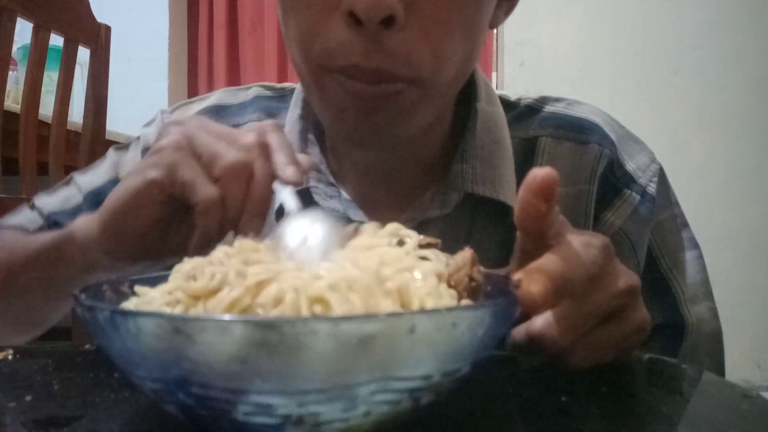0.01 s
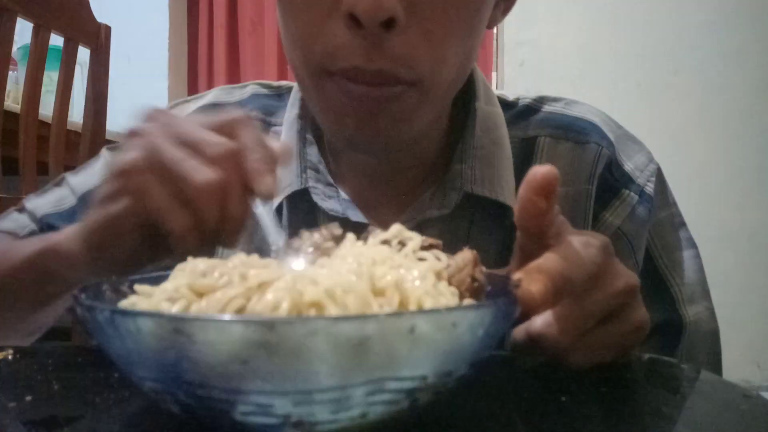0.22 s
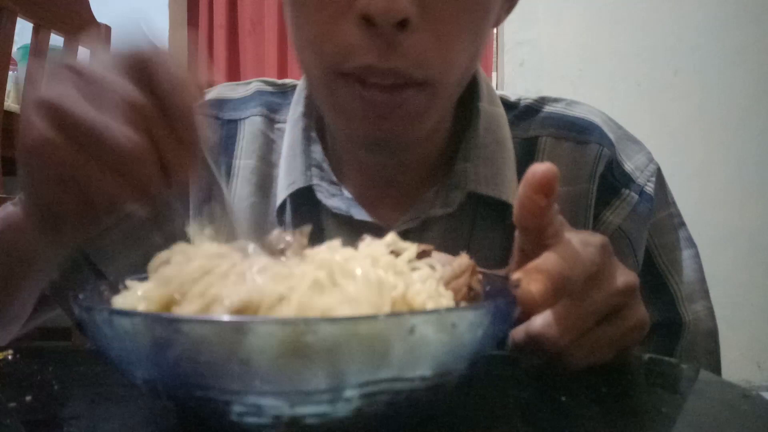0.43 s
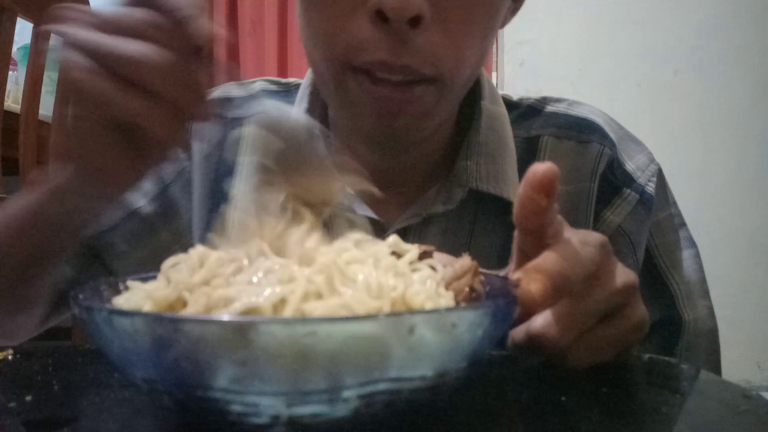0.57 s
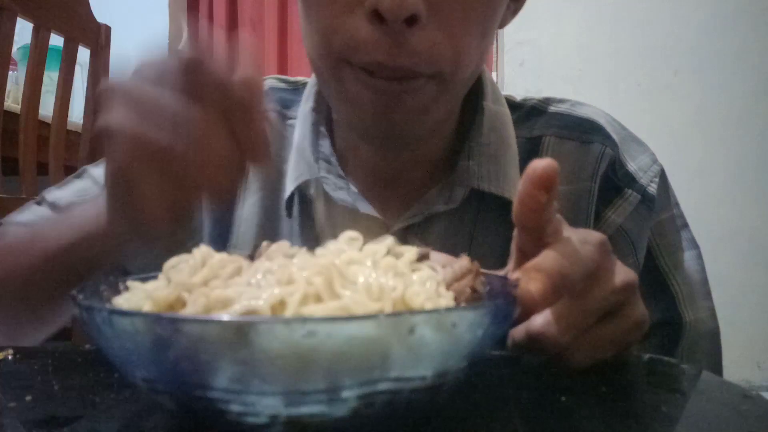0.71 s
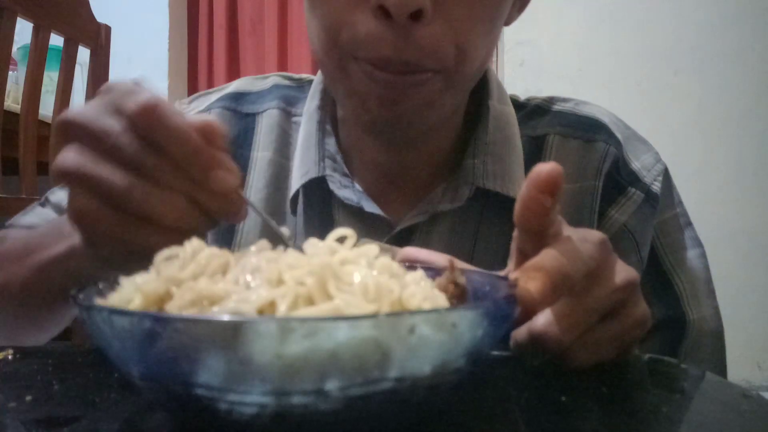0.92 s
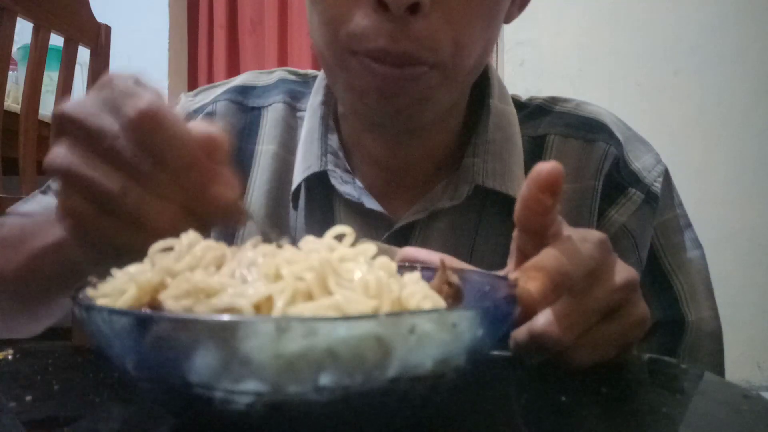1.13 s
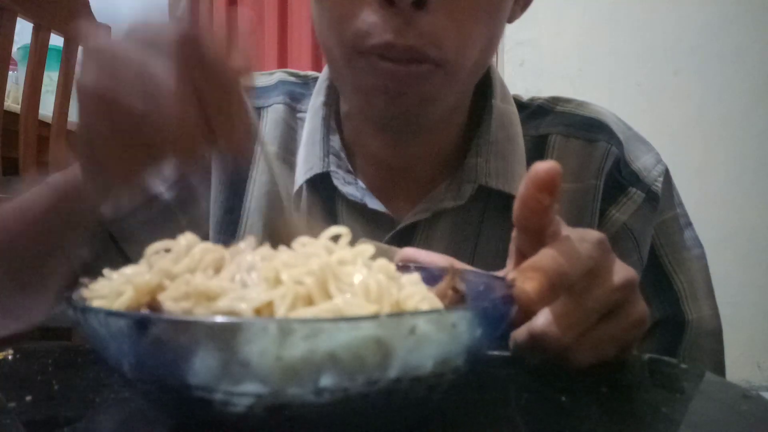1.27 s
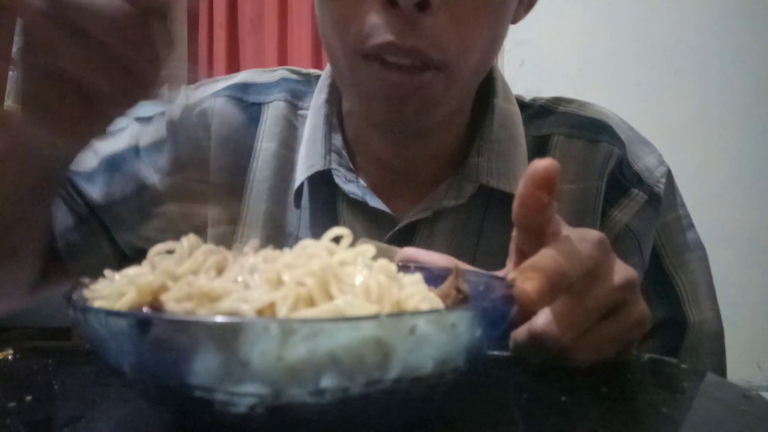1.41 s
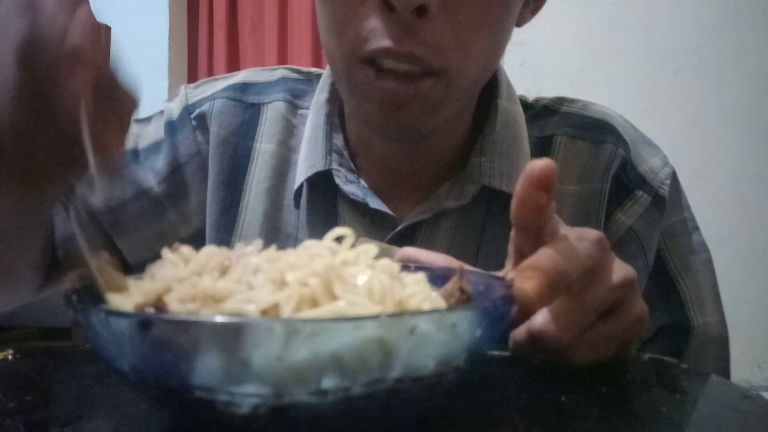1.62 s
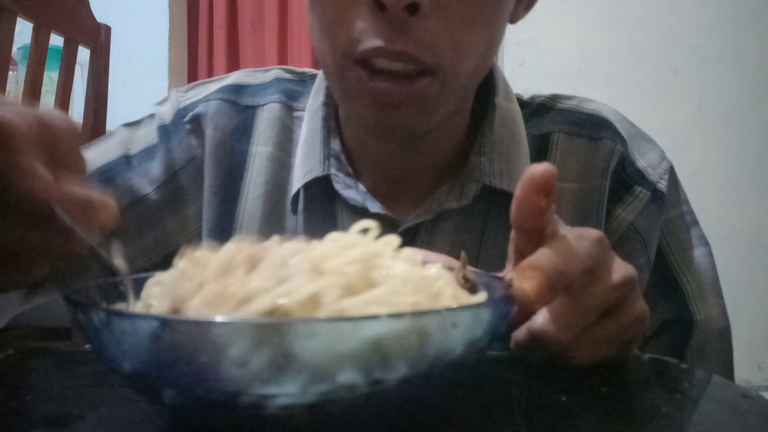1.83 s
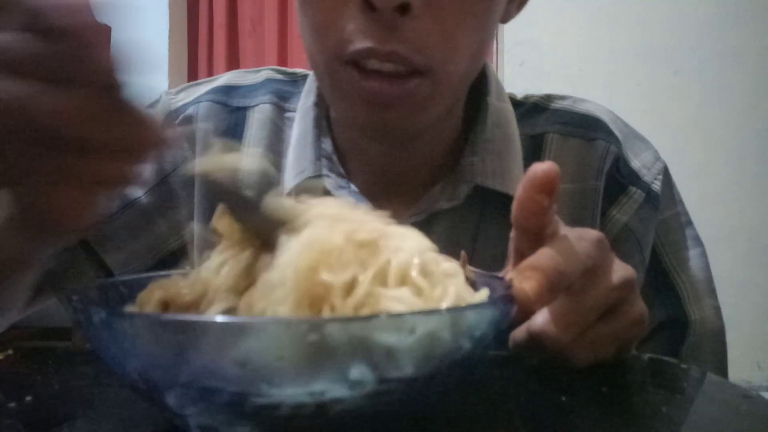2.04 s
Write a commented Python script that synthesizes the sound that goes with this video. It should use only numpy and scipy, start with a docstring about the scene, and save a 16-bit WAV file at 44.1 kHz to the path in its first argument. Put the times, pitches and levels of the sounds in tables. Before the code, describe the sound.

Close up in a hard-walled room, a spoon clacks on a glass bowl, rubs softly, bumps the bowl against the table, quiets down, then strikes hard twice with low thuds, over thin hissing insect chorus.

```python
"""Spoon stirring noodles in a glass bowl

A metal spoon stirs noodles in a glass bowl on a table, close to a small microphone in a hard room.
Short pushes set ringing tones going: the spoon clinks on the glass and the bowl knocks the table top.
Random grains make the scrape, noise bursts the cracks, and soft-started tones the noodle clicks and,
ahead of them, a soft, longer ring of the bowl. Shaped noise makes the two insect choruses and
the faint high hiss from outside, and the air of the room.
"""
import sys
import numpy as np
from scipy import signal
from scipy.fft import rfft, irfft
from scipy.io import wavfile
from scipy.ndimage import uniform_filter1d

SR = 44100
rng = np.random.default_rng(int(sys.argv[2]) if len(sys.argv) > 2 else 0)


def generate_wav(sig):
    """Save sig (samples, or channels by samples) to the path in sys.argv[1] as 16-bit PCM at SR."""
    pcm = np.round(np.clip(np.atleast_2d(sig).T, -1, 1) * 32767).astype(np.int16)
    wavfile.write(sys.argv[1], SR, pcm)


def voltage_ratio(decibels):
    """Convert decibels (scalar or array-like) to amplitude ratios, 20 dB per decade."""
    exponent = np.asarray(decibels, float) / 20
    return 10 ** exponent


N = 90405  # length in samples, about 2 seconds

# Tone colour of the room air. Each row: frequency in Hz, level in dB.
AIR_COLOUR = [(15, -12), (30, -16.5), (60, -3.5), (120, 1.5), (230, -1.5), (330, 1.5), (500, -6),
              (800, -14), (1500, -14.5), (2700, -17.5), (3500, -14), (4000, -35), (6000, -47), (7500, -27)]
# Tone colour of the thin high hiss. Each row: frequency in Hz, level in dB.
HISS_COLOUR = [(7000, -3), (8200, -11), (10000, -14), (11500, -11), (13800, -11), (14500, -4), (15600, 4),
               (15850, -12)]
AIR_LEVEL_DB, HISS_LEVEL_DB = -70, -83

# Swells of the insects. Each row: time in seconds, lower chorus level in dB, upper chorus level in dB.
CHORUS_SWELLS = [(0, -63.5, -61), (.055, -75, -60), (.075, -56, -60.5), (.2, -60.5, -59),
                 (.4, -57.5, -58.5), (.49, -68, -49), (.51, -57.5, -60), (.6, -55.5, -61.5),
                 (.75, -67.5, -62.5), (.87, -60.5, -60), (.97, -63.5, -57.5), (1.09, -63, -63),
                 (1.14, -75, -58.5), (1.25, -59.5, -59.5), (1.36, -69.5, -58.5), (1.46, -59.5, -60.5),
                 (1.6, -76, -58.5), (1.85, -63, -54), (2.05, -61.5, -57)]
# Tone colour of the lower chorus. Each row: frequency in Hz, level in dB.
LOWER_CHORUS_COLOUR = [(2290, -72), (3900, -33), (3970, -75), (4040, -5.5), (4860, 12.5), (5200, -0.5),
                       (5350, -5), (5600, -17.5), (7280, -33), (12300, -120)]
# Tone colour of the upper chorus. Each row: frequency in Hz, level in dB.
UPPER_CHORUS_COLOUR = [(3470, -56), (5900, -26), (5970, -16), (6090, -14.5), (6470, 1.5), (7380, -5),
                       (7680, -22.5), (7840, -21), (8100, -54.5), (10500, -65), (17800, -120)]

# Echo tail of the room, band by band. Each row: middle frequency in Hz, level in dB,
# time to fall by 60 dB in seconds.
ROOM_BANDS = [(139, -9, 0.38), (300, 1.5, 0.5), (600, -1, 0.31), (1110, -6.5, 0.36), (2400, -6.5, 0.38),
              (4800, -4, 0.43), (8300, -5.5, 0.32), (14000, -8, 0.1)]
ROOM_ONSET_S = 0.0032

# Spoon dragging on glass. Each row: time in seconds, low rub level in dB, bright rub level in dB,
# hiss level in dB.
SCRAPE_LEVELS = [(0, -63.5, -67, -85.5), (.1, -58, -71, -87), (.16, -64.5, -72, -86), (.3, -53.5, -55, -90),
                 (.4, -54.5, -58, -77), (.46, -73.5, -65.5, -82.5), (.65, -74, -91.5, -92),
                 (.83, -69.5, -75.5, -87), (1.0, -77, -70, -87), (1.12, -82, -76, -90),
                 (1.23, -62, -62, -90), (1.3, -78, -78, -88), (1.44, -86, -71, -87),
                 (1.455, -69.5, -68, -88), (1.55, -61, -73, -90), (1.65, -63, -57.5, -87),
                 (1.75, -55, -54.5, -84), (1.9, -61, -62.5, -75), (2.05, -65, -62.5, -79)]
# Resonances of the low rub. Each row: frequency in Hz, nominal width in Hz, level in dB.
LOW_RUB_PEAKS = [(306, 33, -16), (617, 125, 1.5), (842, 82, -3.5), (930, 57, 1), (1065, 60, 0),
                 (1249, 91, -9.5)]
# Resonances of the bright rub. Each row: frequency in Hz, nominal width in Hz, level in dB.
BRIGHT_RUB_PEAKS = [(1566, 160, -7), (1773, 120, 0), (2590, 2700, -1), (3360, 160, 4), (5320, 1530, 13.5)]
# Tone colour of the rubbing hiss. Each row: frequency in Hz, level in dB.
RUB_HISS_COLOUR = [(7500, -10), (8200, 1.5), (9500, 1), (11000, -7.5), (13000, -18)]
RUB_GRAINS_PER_S, RUB_SPREAD_DB = 4000, 1.5

# Clicks of noodles, and first a soft, longer ring of the bowl. Each row: start in seconds, level in dB,
# frequency in Hz, time to fall by 60 dB in seconds (the code uses at least 0.003).
CLICKS_AND_BOWL_RING = [(0.205, -40, 6700, 0.3), (.3625, -32, 13500, 0.0046), (.364, -36, 15100, 0.0055),
                        (0.419, -28.5, 5660, 0.0027), (.70, -52, 8450, 0.012), (0.771, -45, 3400, 0.0077),
                        (1.354, -48, 5200, 0.015), (1.364, -45.5, 3325, 0.015), (1.371, -51, 3170, .015),
                        (1.363, -49, 5000, 0.019), (1.3825, -43, 3180, 0.021), (1.385, -45.5, 4420, 0.019),
                        (1.384, -52.5, 1804, 0.031), (1.4, -54.5, 2740, 0.033), (1.965, -56, 9600, 0.0052)]
CLICK_RISE_MS = 0.79

# Noisy cracks and brushes of contact. Each row: start in seconds, direct level in dB,
# level sent into the room in dB, rise in ms, fall in ms, bottom frequency in Hz, top frequency in Hz.
CONTACT_CRACKS = [(.221, -22, -14.5, 0.36, 2.04, 910, 6930), (0.2227, -38, -43, 0.18, 2, 8300, 15800),
                  (.363, -58, -62, 0.76, 3.1, 11000, 15500), (0.383, -58, -62, 1.5, 3, 3000, 14000),
                  (0.47, -51.5, -43.5, 2.9, 19, 248, 710), (.6985, -32, -31.5, 0.52, 5.1, 335, 2680),
                  (1.178, -48, -53, 5.5, 26, 300, 5200), (1.448, -62, -58, .6, 11, 300, 1347),
                  (1.687, -33.5, -23, 0.22, 2.2, 600, 7100), (1.687, -44.5, -43.5, 0.16, 2.8, 8000, 16300),
                  (1.7572, -45, -51, 0.76, 2.2, 1000, 15600), (1.7635, -44.5, -36, 0.74, 2.3, 1000, 15500)]

# The bowl knocks the table top. Each row: start in seconds, thud push in dB, rap push in dB,
# lasting boom push in dB, contact time in ms.
TABLE_KNOCKS = [(.062, -86, -52, -94, 0.66), (.095, -56, -57, -54.5, 0.48), (0.2224, -36, -29, -83, 0.2),
                (.236, -34.5, -59, -35, 1.4), (0.473, -36.5, -43, -47, 1.1), (.53, -50, -68, -46.5, 1.1),
                (0.573, -51.5, -55, -51.5, 0.65), (0.689, -48, -54, -73, 0.29),
                (0.698, -33.5, -30, -42.5, 0.26), (0.749, -67, -58, -51, 1.53),
                (.8215, -74, -46.5, -67, 0.45), (1.184, -56, -60, -56.5, 0.47), (1.201, -50, -51, -56, 0.8),
                (1.449, -78, -67, -89, 0.12), (1.512, -74, -48, -74, 0.48), (1.527, -77, -59, -73, 0.52),
                (1.556, -69, -46.5, -63.5, 0.42), (1.6868, -26.5, -28, -34, 0.24),
                (1.696, -31.5, -50, -78, 0.59), (1.702, -35, -49, -37, 1.23),
                (1.756, -36.5, -36.5, -73, 0.51), (1.781, -27, -50, -32, 2.18),
                (1.872, -71, -55, -51, 0.52)]
# Short low tones of the knock. Each row: frequency in Hz, level in dB before the step-down in knocks(),
# time to fall by 60 dB in seconds.
THUD_MODES = [(185.5, 0, 0.19), (234.4, -6, 0.094), (312, -5, 0.11), (392, -8.5, 0.048), (443, -0.5, 0.12)]
# Short high tones of the knock. Each row: frequency in Hz, level in dB before the step-down in knocks(),
# time to fall by 60 dB in seconds.
RAP_MODES = [(540.3, -4, 0.034), (601, -4, 0.044), (749, -10, 0.042), (872, 0.5, 0.021), (969, -4, 0.034),
             (1223, -0.5, 0.022), (1590, -14.5, 0.022), (1995, -6, 0.058), (2090, -1, 0.028),
             (2670, -12, .025), (2890, 8.5, 0.033)]
# Long tones of the table top. Each row: frequency in Hz, level in dB, time to fall by 60 dB in seconds.
TABLE_MODES = [(69.5, -12.5, 0.24), (128.5, -21.5, 1.8), (151.7, -6, 0.83), (201.5, -8, 0.66),
               (269.7, -8, 0.81), (322, -13, 1.3), (420, -15, 0.42), (470, -21, 0.42)]
KNOCK_LOW_HZ = 161

# Spoon blows on the glass. Each row: start in seconds, spoon push in dB, handle push in dB,
# lower bowl push in dB, upper bowl push in dB, contact time in ms.
SPOON_BLOWS = [(0.221, -8, -64, -58, -45, 0.09), (.382, -53, -70, -54, -62, 0.082),
               (.574, -59, -70, -51.5, -55, 0.24), (1.188, -38.5, -66, -51, -62, .1),
               (1.6867, -30, -31.5, -24, -26, 0.055), (1.7023, -41, -62, -38, -34.5, 0.1),
               (1.75, -60, -44, -54, -63, 0.033), (1.7569, -50, -33, -40, -34.5, 0.047),
               (1.7659, -36, -50, -33, -35, 0.065)]
# Tones of the spoon. Each row: frequency in Hz, level in dB, time to fall by 60 dB in seconds.
SPOON_MODES = [(2226, -17.5, 0.022), (2575, -24.5, .02), (3220, -22, 0.015), (4210, -5.5, 0.019),
               (4965, -3, 0.021), (5720, -13, 0.023), (5950, -14, 0.016), (6665, 6.5, 0.023),
               (7200, -8, 0.027), (7700, -36, 0.035), (9900, -36, .05), (11600, -36, .025)]
# Tone of the handle. Each row: frequency in Hz, level in dB, time to fall by 60 dB in seconds.
HANDLE_MODES = [(4145, 0, .07)]
# Lower tones of the glass bowl. Each row: frequency in Hz, level in dB, time to fall by 60 dB in seconds.
LOWER_BOWL_MODES = [(1034, -12.5, 0.089), (1691, -2, 0.011), (1783, -4.5, 0.032), (2040, -12, 0.021),
                    (2580, -15, 0.033), (3310, -6, 0.025), (3476, -2, 0.036), (3730, -1.5, 0.024)]
# Upper tones of the glass bowl. Each row: frequency in Hz, level in dB, time to fall by 60 dB in seconds.
UPPER_BOWL_MODES = [(4930, -7, 0.018), (6050, -7, 0.07), (6060, -4.5, 0.096), (6280, 6.5, 0.037),
                    (6900, -10.5, 0.06), (6460, -9, 0.017), (7800, -21, 0.014), (8500, -30, 0.038),
                    (12400, -22, .04)]

KNOCK_ROOM_DB, RING_ROOM_DB = 0.5, -7  # how strongly knocks and ringing enter the room
MIC_LOW_HZ = 51.4


def level(x, db=0):
    """Set the average (rms) strength of a sound."""
    return x * voltage_ratio(db) / np.sqrt(np.mean(x ** 2))


def curve(table, col):
    """Turn one dB column of a table into a gain that moves smoothly over time."""
    table = np.array(table)
    return voltage_ratio(np.interp(np.arange(N) / SR, table[:, 0], table[:, col]))


def coloured(points, x=None):
    """Filter noise (or x) by a curve of (Hz, dB) points, silent outside them; rms 1."""
    points = np.array(points)
    hz = np.arange(1, N // 2 + 2) * SR / N
    if x is None:
        x = rng.standard_normal(N)
    db = np.interp(np.log(hz), np.log(points[:, 0]), points[:, 1], -200, -200)
    return level(irfft(rfft(x) * voltage_ratio(db), N))


def walk(rate):
    """Wander randomly: values held for 1 / rate seconds, then smoothed twice; spread near 1."""
    hold = int(SR / rate)
    steps = np.repeat(rng.standard_normal(N // hold + 1), hold)
    smooth = uniform_filter1d(uniform_filter1d(steps, hold), hold)
    return 1.3 * smooth[:N]


def pushes(times, dbs, contact_ms):
    """Make bell-shaped contact forces; a longer contact is duller."""
    force = np.zeros(N + 400)
    k = np.arange(400)
    for start_s, db, ms in zip(times, dbs, contact_ms):
        first = int(start_s * SR)
        contact = ms * SR / 1000  # in samples
        # the push peaks two contact times after its start
        from_peak = k - start_s * SR + first - 2 * contact
        push = np.exp(-.5 * (from_peak / (.4 * contact)) ** 2)
        force[first:first + 400] += voltage_ratio(db) * push / push.sum()
    return force[:N]


def ring(force, modes, sense=-1):
    """Let a force drive fading tones; each next tone is multiplied by one more factor of sense."""
    out = np.zeros(N)
    for k, (hz, db, t60) in enumerate(modes):
        fade = np.log(1000) / max(t60, .003)  # never shorter than 3 ms
        pole = np.exp((2j * np.pi * hz - fade) / SR)
        tone = signal.lfilter([1], [1, -pole], force).imag
        out += sense ** k * voltage_ratio(db) * tone
    return out


def room_air():
    """The quiet air of the room is steady noise, strongest in the bass."""
    return voltage_ratio(AIR_LEVEL_DB) * coloured(AIR_COLOUR)


def thin_hiss():
    """The faint high hiss is steady noise limited to the treble."""
    return voltage_ratio(HISS_LEVEL_DB) * coloured(HISS_COLOUR)


def insects():
    """Two bands of noise swell by the table and flicker at random, like hissing choruses."""
    lower_flicker, upper_flicker = voltage_ratio(1.6 * walk(90)), voltage_ratio(1.03 * walk(44.26))
    lower = curve(CHORUS_SWELLS, 1) * lower_flicker * coloured(LOWER_CHORUS_COLOUR)
    upper = curve(CHORUS_SWELLS, 2) * upper_flicker * coloured(UPPER_CHORUS_COLOUR)
    return lower + upper


def room(x):
    """Scattered echoes form a tail: bands of noise, each fading at its own speed."""
    t = np.arange(N) / SR
    tail = np.zeros(N)
    for hz, db, t60 in ROOM_BANDS:
        band = coloured([(hz / 2, -30), (hz / 1.5, 0), (hz * 1.3, 0), (hz * 2, -30)])
        band = band * 10 ** (-3 * t / t60)
        tail += voltage_ratio(db) * band * np.sqrt(hz / SR / np.sum(band ** 2))
    tail = tail * (1 - np.exp(-t / ROOM_ONSET_S))
    return signal.fftconvolve(x, tail)[:N]


def rubbed_body(grains, peaks):
    """Grains excite resonances; a wider one fades faster, down to a shortest fade of 3 ms."""
    modes = [(hz, db + 10 * np.log10(width), 2.2 / width) for hz, width, db in peaks]
    return level(ring(grains, modes))


def scrape():
    """Dense slip grains of the dragged spoon sound through the rubbed glass and the table under it."""
    chosen = rng.random(N) < RUB_GRAINS_PER_S / SR
    strength = voltage_ratio(RUB_SPREAD_DB * rng.exponential(size=N))
    grains = chosen * strength * rng.standard_normal(N)
    low = rubbed_body(grains, LOW_RUB_PEAKS)
    bright = rubbed_body(grains, BRIGHT_RUB_PEAKS)
    bright = coloured([(500, -30), (1300, 0), (6500, 0), (8500, -30)], bright)
    hiss = coloured(RUB_HISS_COLOUR, grains)
    return curve(SCRAPE_LEVELS, 1) * low + curve(SCRAPE_LEVELS, 2) * bright + curve(SCRAPE_LEVELS, 3) * hiss


def clicks_and_bowl_ring():
    """Each noodle click, and the longer bowl ring ahead of them, is one fading tone with a soft start."""
    out = np.zeros(N)
    for start_s, db, hz, t60 in CLICKS_AND_BOWL_RING:
        t = np.maximum(np.arange(N) / SR - start_s, 0)
        rise = 1 - np.exp(-(1000 * t / CLICK_RISE_MS) ** 2)
        fade = 10 ** (-3 * t / max(t60, .003))
        out += voltage_ratio(db) * rise * fade * np.sin(2 * np.pi * hz * t)
    return out


def cracks():
    """Contact noise comes in band-limited bursts that rise and fall: direct, and as sent into the room."""
    out = np.zeros((2, N))
    noise = rng.standard_normal(N)
    for start_s, db, room_db, rise_ms, fall_ms, low_hz, top_hz in CONTACT_CRACKS:
        ms = np.maximum(np.arange(N) / SR - start_s, 0) * 1000
        band_filter = signal.butter(4, [low_hz, top_hz], "band", fs=SR, output="sos")
        band = level(signal.sosfilt(band_filter, noise))
        burst = band * (1 - np.exp(-ms / rise_ms)) * np.exp(-ms / fall_ms)
        out += voltage_ratio(np.array([[db], [room_db]])) * burst
    return out


def knocks():
    """The bowl's push on the wood gives a short knock, without deep bass, and a long table boom."""
    times, thud_db, rap_db, boom_db, contact_ms = np.array(TABLE_KNOCKS).T
    # a sense below 1 weakens each next tone a little more
    thud = ring(pushes(times, thud_db, contact_ms), THUD_MODES, sense=0.89)
    rap = ring(pushes(times, rap_db, contact_ms), RAP_MODES, sense=0.91)
    bass_cut = signal.butter(2, KNOCK_LOW_HZ, "high", fs=SR)
    knock = signal.lfilter(*bass_cut, thud + rap)
    boom = ring(pushes(times, boom_db, contact_ms), TABLE_MODES)
    return knock, boom


def clinks():
    """Each blow rings the spoon, its handle and the lower and upper tones of the bowl, each by its own push."""
    times, *push_dbs, contact_ms = np.array(SPOON_BLOWS).T
    tones = (SPOON_MODES, HANDLE_MODES, LOWER_BOWL_MODES, UPPER_BOWL_MODES)
    return sum(ring(pushes(times, db, contact_ms), modes) for db, modes in zip(push_dbs, tones))


def scene():
    """Mix the near sounds, some echoed by the room and all thinned in deep bass, with the background."""
    background = room_air() + thin_hiss() + insects()
    rings = clinks() + clicks_and_bowl_ring()
    knock, boom = knocks()
    crack, crack_sent = cracks()
    echoes = room(voltage_ratio(KNOCK_ROOM_DB) * knock + voltage_ratio(RING_ROOM_DB) * rings + crack_sent)
    wavering_boom = voltage_ratio(3.24 * walk(14)) * boom
    near = rings + knock + crack + echoes + wavering_boom + scrape()
    mic_bass_cut = signal.butter(2, MIC_LOW_HZ, "high", fs=SR)
    return (signal.lfilter(*mic_bass_cut, near) + background)[None]  # one channel


def top_cut(x):
    """Nothing passes above the cut-off."""
    return signal.sosfilt(signal.butter(12, 16970, fs=SR, output="sos"), x)


def record(dry):
    """Turn the finished mix into the sound to be saved."""
    return top_cut(dry)


dry = scene()
out = record(dry)
generate_wav(out)
```